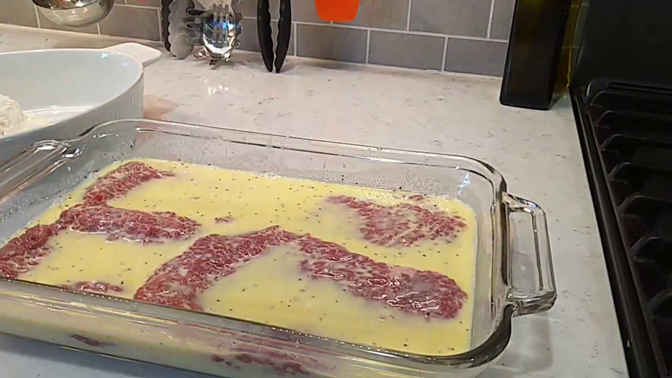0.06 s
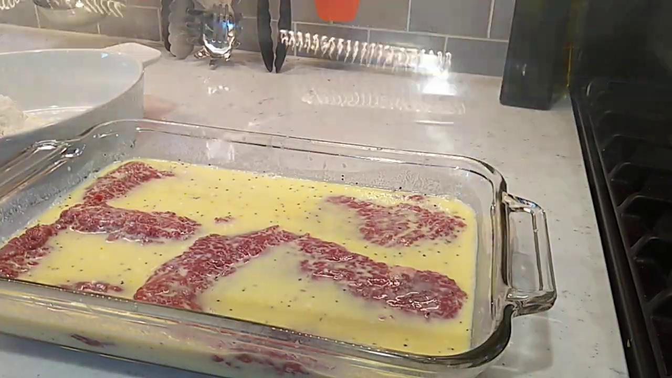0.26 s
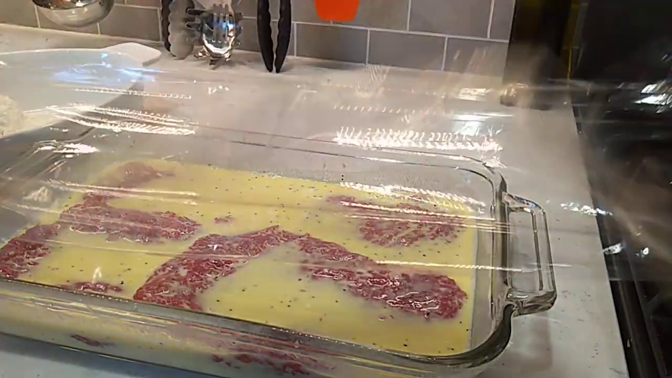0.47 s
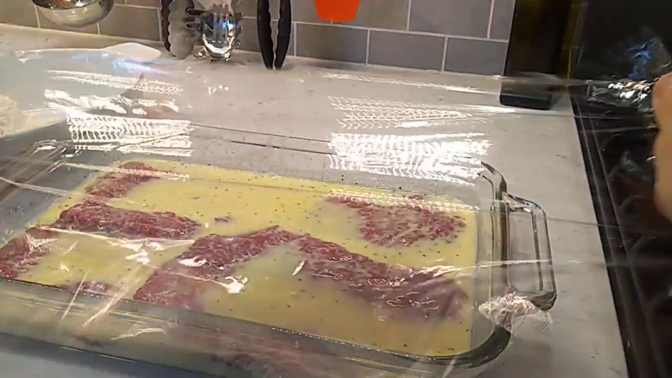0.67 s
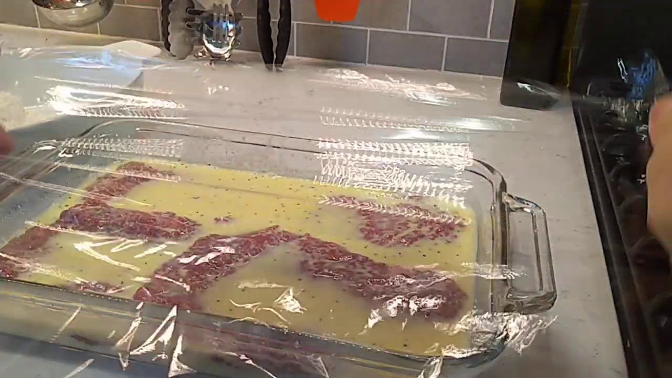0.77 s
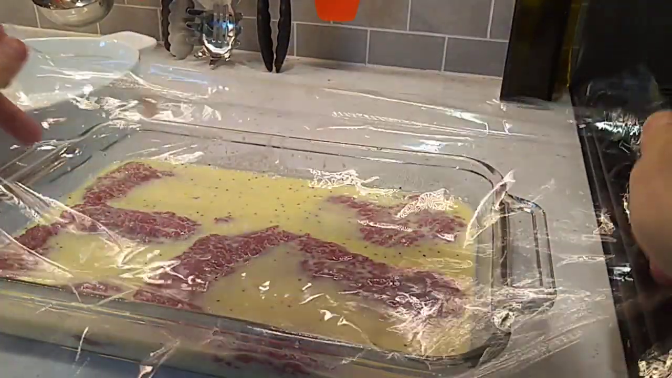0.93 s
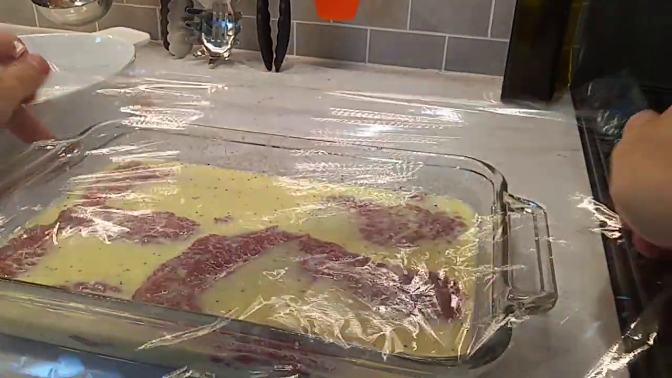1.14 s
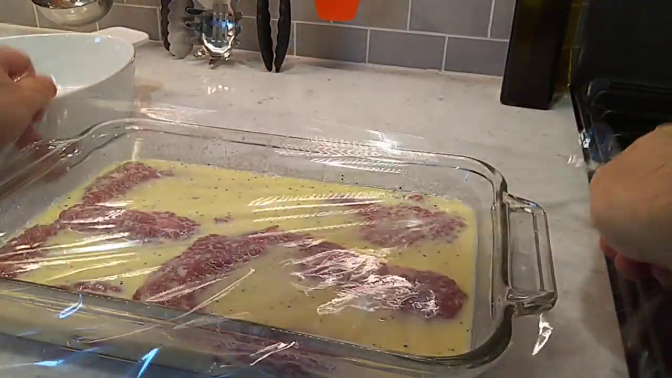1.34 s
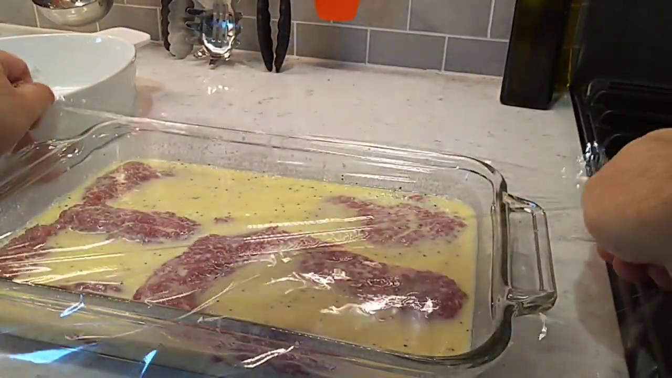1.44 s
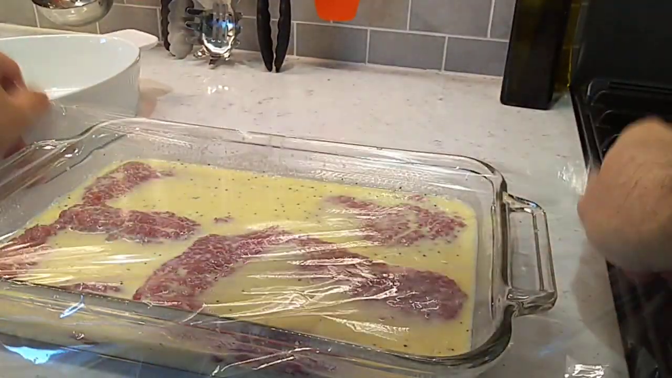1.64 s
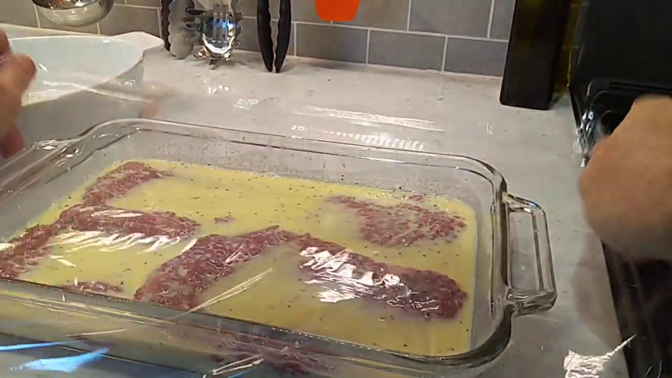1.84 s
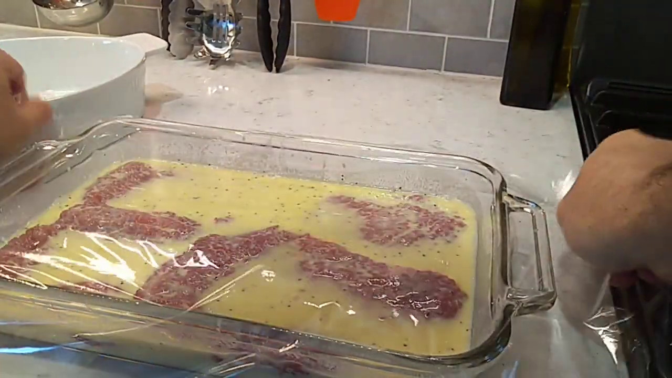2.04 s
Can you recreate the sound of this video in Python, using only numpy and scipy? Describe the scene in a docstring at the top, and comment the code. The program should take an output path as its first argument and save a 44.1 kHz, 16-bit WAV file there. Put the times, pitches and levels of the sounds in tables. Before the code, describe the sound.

Close-up cling film crinkling in a small tiled kitchen: one loud crisp snap, then light ticks and a swelling rustle with faint high squeaks, ending in snaps and soft taps on the glass dish.

```python
"""Plastic cling film is stretched over a glass dish in a kitchen, heard close up.
From the start: room air and a refrigerator-like hum (noise, fuzzy tones), film rustle (hiss with ticks)
and a hand brushing the sheet (dull noise). From 0.04 s creases snap (noise bursts) and the tiled room
answers each one (decaying noise). From 0.38 s fingers tap the dish (decaying sine modes); from 0.4 s to
1.6 s the taut film squeaks very high (noise-modulated tones whose pitch follows the tension)."""
import sys
import numpy as np
from scipy import signal
from scipy.fft import rfft, irfft
from scipy.io import wavfile
from scipy.ndimage import uniform_filter1d, map_coordinates

SR = 44100
rng = np.random.default_rng(int(sys.argv[2]) if len(sys.argv) > 2 else 0)


def to_wav(s):
    """Save 16-bit WAV."""
    ch = np.atleast_2d(s).T  # columns
    pcm = np.round(np.clip(ch, -1, 1) * 32767)  # PCM
    wavfile.write(sys.argv[1], SR, pcm.astype(np.int16))


def voltage_ratio(level):
    """Linear amplitude factor for a level in decibels (scalar or array-like)."""
    return 10 ** (np.asarray(level, float) / 20)


N = 92610

# Room air spectrum: (frequency [Hz], relative density [dB/Hz])
AIR_SPECTRUM = [(25, -59), (55, 0.5), (150, -6.5), (220, -3.5), (430, -7.5), (620, -20.5), (1200, -29.5),
                (3400, -21), (9000, -24), (16000, -55)]
# Hum partials: (frequency [Hz], rms level before LEAN [dB])
HUM_PARTIALS = [(59.2, -71), (209.9, -67), (317.6, -68.5)]
# Stereo likeness of air and sheet noise: (frequency [Hz], left-right correlation [-1..1])
LIKENESS = [(60, 0.81), (350, 0.99), (800, 0.011)]
# Stereo balance of air, hum and sheet: (frequency [Hz], left minus right [dB])
LEAN = [(60, -2.5), (300, 4.5), (1000, 3.7)]
AIR_LEVEL_DB, HUM_KNOTS_PER_S = -58.5, 5.976

# Film in motion: (time [s], relative level [dB])
RUSTLE_LEVEL = [(0, -37), (.17, -47), (.3, -40.5), (.5, -47), (.78, -46), (1.04, -33), (1.25, -38.5),
                (1.52, -48), (1.62, -38.5), (1.8, -40.5), (1.95, -41.5), (2.1, -39)]
# Rustle spectrum: (frequency [Hz], relative density [dB/Hz])
FILM_SPECTRUM = [(900, -19.5), (3300, -20.5), (7300, -19.5), (9500, -18.5), (11500, -7), (14600, -13),
                 (16800, 2)]
TICKS_PER_S, TICK_SPREAD_DB, TICKS_DB, TICK_T60_S = 200, 3, -7, .008
PATCHY_DB = 3.5

# Hand moving the sheet: (time [s], level [dB])
BRUSH_LEVEL = [(0, -61), (.75, -68), (.84, -51), (.96, -49), (1.08, -56.5), (1.35, -63.5), (1.68, -62.5),
               (1.75, -44), (1.86, -55), (2.1, -63)]
# Loose sheet spectrum: (frequency [Hz], relative density [dB/Hz])
SHEET_SPECTRUM = [(80, -59), (170, -5), (410, -4.5), (850, -9.5), (2000, -20), (8000, -21)]

# Snapping creases: (time [s], relative level [dB],
# dull over bright part before DULL_GAIN_DB [dB], left minus right [dB])
CREASES = [(0.0439, -32.5, -21, 15), (0.1266, -41.5, -19, 11), (0.2138, -10, -29.5, 5.5),
           (0.2303, -24, -18, 1), (0.2651, -27, -24.5, 14), (0.27, -30, -41, 16), (0.284, -41, -46, 0),
           (0.364, -29.5, -32, -10), (0.5455, -35.5, -53, 11), (0.5559, -24, -40, 5.5),
           (0.6619, -32, -34, 2), (0.692, -38.5, -11, 14.5), (0.9063, -28, -35, 6), (0.9468, -25.5, -28, 9),
           (0.9765, -24, -48, 0), (1.0364, -29.5, -17.5, 1), (1.0456, -25, -33, 8), (1.2715, -25, -29, 7),
           (1.4686, -27, -43, 4), (1.5558, -26.5, -27, -2), (1.6305, -17, -21, -16), (1.699, -52, -32, 12),
           (1.714, -16.5, -15.5, -1.5), (1.731, -14, -13.5, 5.5), (1.7863, -24, -11, 7.5),
           (1.7902, -23, -19.5, -18), (1.9043, -31.5, -15.5, 8.5), (1.908, -32, -14.5, 10),
           (1.984, -26.5, -48, 6)]
# Bright part of a snap: (frequency [Hz], relative density [dB/Hz])
BRIGHT_SPECTRUM = [(900, -25.5), (1500, -42), (5000, -14.5), (8900, -8), (13800, -1), (16800, 0.5)]
# Dull part of a snap: (frequency [Hz], relative density [dB/Hz])
DULL_SPECTRUM = [(70, -21.5), (250, -3.5), (650, -14.5), (1000, -2.5), (1500, -4.5), (4000, -3.5),
                 (8000, -21.5), (15000, -7)]
SNAP_RISE_S, RISE_DB, SPIKY_DB = .0015, 25, 5
SNAP_GAIN_DB, DULL_GAIN_DB = 1, 7
SNAP_T60_S, LONGER_DB_PER_DULL_DB = .022, .5  # t60 at dull part 0 dB, and its change
# Room answer at dull part 0 dB, and its change
EARLY_DB, EARLY_T60_S, TAIL_DB, TAIL_T60_S = -8.5, .062, -17, .32
WETTER_DB_PER_DULL_DB = .3
RAGGED_DB, RAGGED_KNOTS_PER_S = 4, 600  # flicker of the room answer

# Finger taps: (time [s], relative level [dB])
TAP_TIMES = [(.379, -49.5), (.693, -57), (.84, -43.5), (1.733, -31), (1.789, -37)]
# Modes of the loaded dish: (frequency [Hz], relative level [dB], t60 [s])
DISH_MODES = [(801.5, -5.5, 0.16), (960, -1, 0.04), (1076, -2.5, 0.032), (1270, -20, 0.036)]
TAP_RISE_S = .0015

# Squeak of the taut film: (time [s], pitch before strand ratio [Hz], relative level [dB])
SQUEAK_PATH = [(.4, 10800, -70), (.55, 11300, -63), (.62, 10050, -64), (.7, 10800, -61), (.79, 10900, -58),
               (.85, 11700, -55), (.92, 11000, -57), (1.11, 12100, -59), (1.17, 13500, -57),
               (1.24, 14200, -57), (1.32, 14100, -56), (1.4, 13400, -54), (1.45, 12300, -54),
               (1.5, 11200, -57), (1.6, 9300, -68)]
# Slipping strands: (pitch ratio, relative level [dB], left minus right [dB])
SQUEAK_STRANDS = [(1.0, 0, -2), (1.085, 2, 1)]
CORE_KNOTS_PER_S, SKIRT_KNOTS_PER_S, SKIRT_DB = 170, 1100, -1

BAND_TOP_HZ = 15700


def unit(x):
    """Scales x to rms 1."""
    return x / np.sqrt(np.mean(x ** 2) + 1e-20)


def along(points, hz):
    """Interpolates (Hz, value) points on a log frequency axis."""
    point_hz, value = np.transpose(points)
    return np.interp(np.log(hz + 1), np.log(point_hz + 1), value)


def curves(rows):
    """One value per sample for each column after the time."""
    time_s, *columns = np.transpose(rows)
    return [np.interp(np.arange(N) / SR, time_s, c, left=c[0]) for c in columns]


def wobble(knots_per_s):
    """Smooth random curve through random knots."""
    knots = rng.standard_normal(int(N * knots_per_s / SR) + 4)
    return map_coordinates(knots, [np.arange(N) * knots_per_s / SR])


def coloured(x, spectrum):
    """Minimum-phase filter (folded cepstrum) that keeps the power of white noise."""
    gain = voltage_ratio(along(spectrum, np.fft.rfftfreq(4096, 1 / SR)))
    cepstrum = irfft(np.log(np.maximum(unit(gain), 1e-5)))
    cepstrum[1:2048] *= 2
    cepstrum[2049:] = 0
    response = irfft(np.exp(rfft(cepstrum)))
    return signal.fftconvolve(x, response[None], axes=1)[:, :N]


def sides(pan_db):
    """Left and right gain for a left-minus-right level."""
    return voltage_ratio(np.array([pan_db / 2, -pan_db / 2]))


def correlated(a, b, alike):
    """Mixes two independent noises into a stereo pair of the given correlation."""
    angle = np.arccos(np.clip(alike, -1, 1)) / 2
    return np.array([np.cos(angle) * a + np.sin(angle) * b, np.cos(angle) * a - np.sin(angle) * b])


def pair(shape, alike):
    """Stereo white noise of the given correlation."""
    a, b = rng.standard_normal((2,) + shape)
    return correlated(a, b, alike)


def spread(spectrum):
    """Stereo noise of rms 1 with frequency-dependent likeness and balance."""
    hz = np.fft.rfftfreq(N, 1 / SR)
    a, b = rfft(rng.standard_normal((2, N)))
    both = correlated(a, b, along(LIKENESS, hz))
    return unit(irfft(both * voltage_ratio(along(spectrum, hz)) * sides(along(LEAN, hz)), N))


def narrow(hz, knots_per_s):
    """Fuzzy tone of rms 1 per channel: quadrature carriers under random envelopes."""
    phase = 2 * np.pi * np.cumsum(hz * np.ones(N)) / SR
    return np.array([unit(wobble(knots_per_s) * np.sin(phase) + wobble(knots_per_s) * np.cos(phase))
                     for _ in "lr"])


def patchy(x):
    """Random patches of gain in time and frequency, shared by both channels."""
    z = signal.stft(x)[2]
    field = rng.standard_normal(z.shape[1:])
    field = uniform_filter1d(field, size=4, axis=0)
    field = uniform_filter1d(field, size=16, axis=1)
    return signal.istft(z * voltage_ratio(PATCHY_DB * unit(field)))[1][:, :N]


def kitchen():
    """Room air as shaped noise; hum as wavering narrow tones."""
    out = voltage_ratio(AIR_LEVEL_DB) * spread(AIR_SPECTRUM)
    for hz, db in HUM_PARTIALS:
        tone = narrow(hz, HUM_KNOTS_PER_S)[0]  # same tone on both sides
        out += voltage_ratio(db) * sides(along(LEAN, hz))[:, None] * tone
    return out


def rustle():
    """Tiny slips of the film: wavering hiss with random decaying ticks on it."""
    level_db, = curves(RUSTLE_LEVEL)
    size = voltage_ratio(TICK_SPREAD_DB * rng.exponential(size=N))
    size *= rng.random(N) < TICKS_PER_S / SR
    decay = voltage_ratio(-60 * np.arange(600) / SR / TICK_T60_S)
    ticks = unit(signal.fftconvolve(size, decay)[:N])
    hiss = voltage_ratio(0.28 * wobble(9.34) + 2.4 * wobble(57.38))
    noise = (hiss + voltage_ratio(TICKS_DB) * ticks) * pair((N,), 0.011)
    return voltage_ratio(level_db) * patchy(coloured(noise, FILM_SPECTRUM))


def brush():
    """Loose sheet fluttering dully under the hand: shaped noise of wavering level."""
    level_db, = curves(BRUSH_LEVEL)
    return voltage_ratio(level_db + 3 * wobble(90)) * spread(SHEET_SPECTRUM)


def snaps():
    """Each crease swells for an instant and bursts, bright and dull; the room answers with noise."""
    t = np.arange(SR // 4) / SR
    bright, dull = np.zeros((2, 2, N + len(t)))
    late = t - SNAP_RISE_S
    early = voltage_ratio(EARLY_DB - 60 * late / EARLY_T60_S)
    tail = voltage_ratio(TAIL_DB - 60 * late / TAIL_T60_S)
    room = (early + tail) * (late > 0)
    for time_s, db, dull_db, pan_db in CREASES:
        t60_s = SNAP_T60_S * voltage_ratio(LONGER_DB_PER_DULL_DB * max(dull_db, -34))
        shape = voltage_ratio(np.where(late < 0, RISE_DB * late / SNAP_RISE_S, -60 * late / t60_s))
        # spike gain held for 9 samples
        spikes = voltage_ratio(SPIKY_DB * np.repeat(rng.standard_normal(len(t) // 8), 9)[:len(t)])
        ragged_db = RAGGED_DB * wobble(RAGGED_KNOTS_PER_S)[:len(t)]
        answer = voltage_ratio(WETTER_DB_PER_DULL_DB * dull_db + ragged_db) * room
        start = round((time_s - SNAP_RISE_S / 2) * SR)
        for track, gain_db, alike in ((bright, 0, .2), (dull, dull_db + DULL_GAIN_DB, .4)):
            burst = spikes * shape * pair(t.shape, alike)
            # same energy as the plain envelope
            burst *= np.sqrt(np.sum(shape ** 2) / np.sum(burst ** 2, axis=1, keepdims=True))
            sound = burst * sides(pan_db)[:, None] + answer * pair(t.shape, alike)
            track[:, start:][:, :len(t)] += voltage_ratio(db + SNAP_GAIN_DB + gain_db) * sound
    return coloured(bright[:, :N], BRIGHT_SPECTRUM) + coloured(dull[:, :N], DULL_SPECTRUM)


def taps():
    """Loaded dish rings briefly: decaying modes, random strength per tap, random phase per side."""
    t = np.arange(SR // 4) / SR
    out = np.zeros((2, N + SR))
    rise = np.minimum(t / TAP_RISE_S, 1)
    for time_s, db in TAP_TIMES:
        start = round(time_s * SR)
        for hz, mode_db, t60_s in DISH_MODES:
            phase = rng.normal(0, 1, (2, 1))
            envelope = voltage_ratio(db + mode_db + rng.normal(0, 2.5) - 60 * t / t60_s) * rise
            out[:, start:][:, :len(t)] += envelope * np.sin(2 * np.pi * hz * t + phase)
    return out[:, :N]


def squeak():
    """Strands slip together: each a fuzzy whistle in a wider hiss, pitch following the tension."""
    hz, level_db = curves(SQUEAK_PATH)
    t = np.arange(N) / SR
    on = (t > SQUEAK_PATH[0][0]) & (t < SQUEAK_PATH[-1][0])
    out = np.zeros((2, N))
    for ratio, db, pan_db in SQUEAK_STRANDS:
        gain = on * voltage_ratio(level_db + db + 3 * wobble(30)) * sides(pan_db)[:, None]
        whistle = narrow(ratio * hz, CORE_KNOTS_PER_S)
        skirt = voltage_ratio(SKIRT_DB) * narrow(ratio * hz, SKIRT_KNOTS_PER_S)
        out += gain * (whistle + skirt)
    return out


def scene():
    """Sum of all sources."""
    return kitchen() + rustle() + brush() + snaps() + taps() + squeak()


def low_pass(x):
    """Removes everything above the highest recorded frequency."""
    return signal.sosfilt(signal.butter(12, 16990, fs=SR, output="sos"), x)


def record(dry):
    """Band limit: gain falls by 45 dB over 450 Hz above BAND_TOP_HZ."""
    hz = np.fft.rfftfreq(N, 1 / SR)
    cut_db = -45 * np.clip((hz - BAND_TOP_HZ) / 450, 0, 1)
    mix = irfft(rfft(dry) * voltage_ratio(cut_db), N)
    return low_pass(mix)


dry = scene()
out = record(dry)
to_wav(out)
```